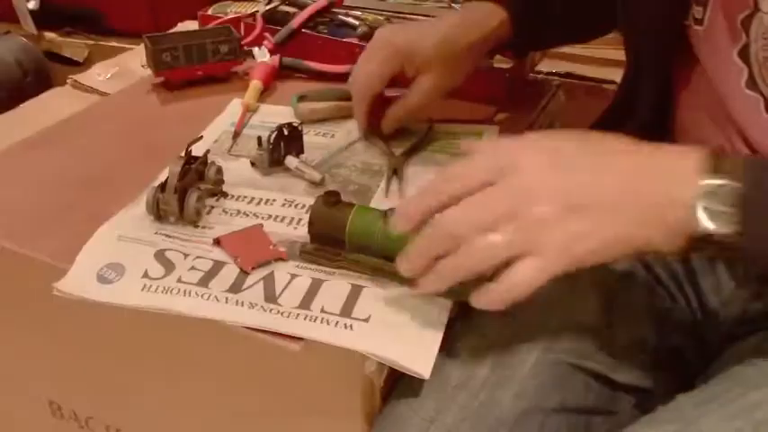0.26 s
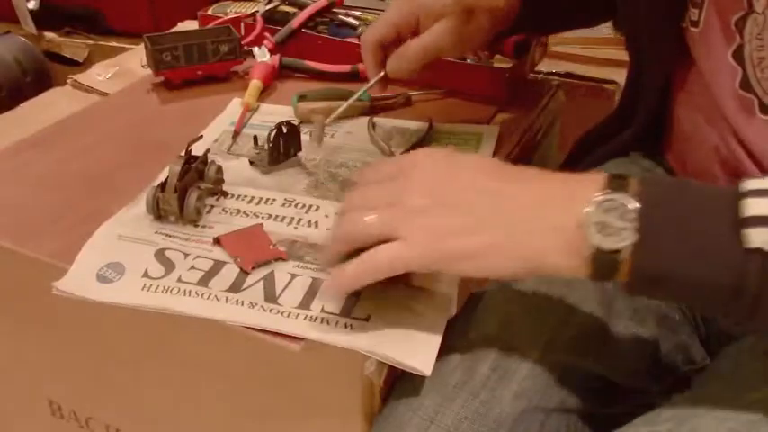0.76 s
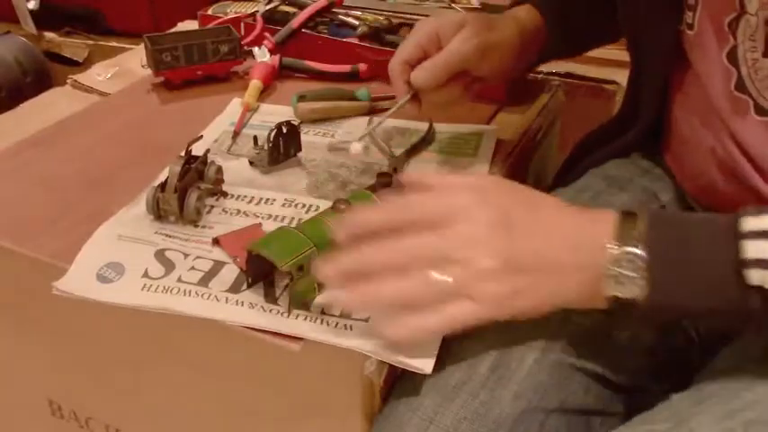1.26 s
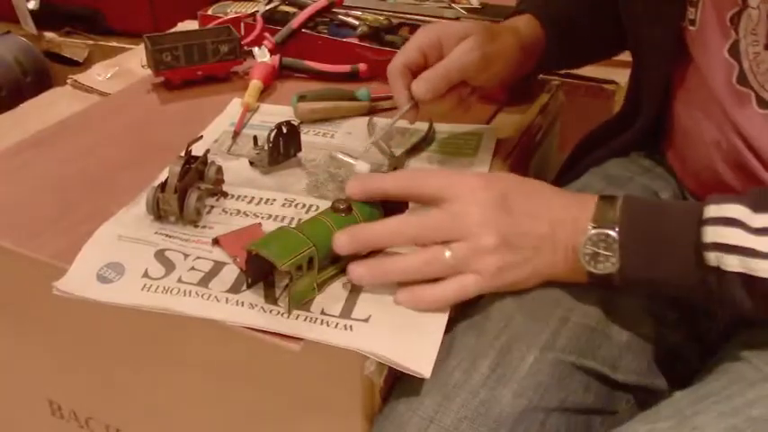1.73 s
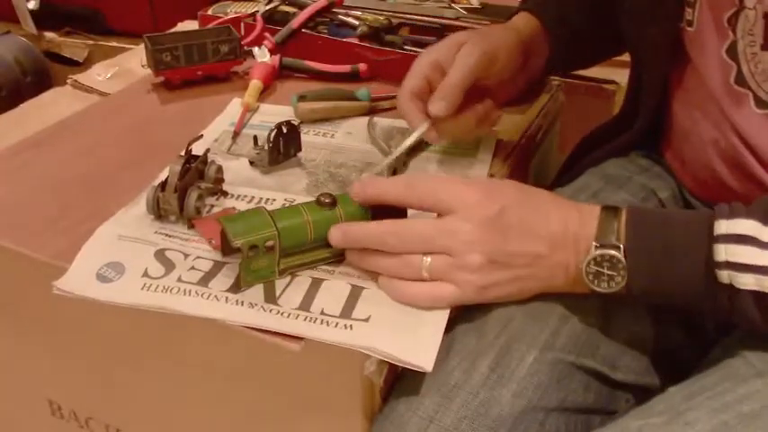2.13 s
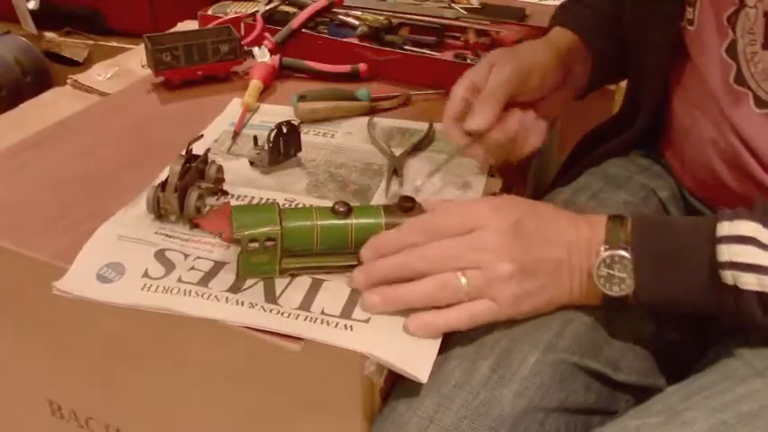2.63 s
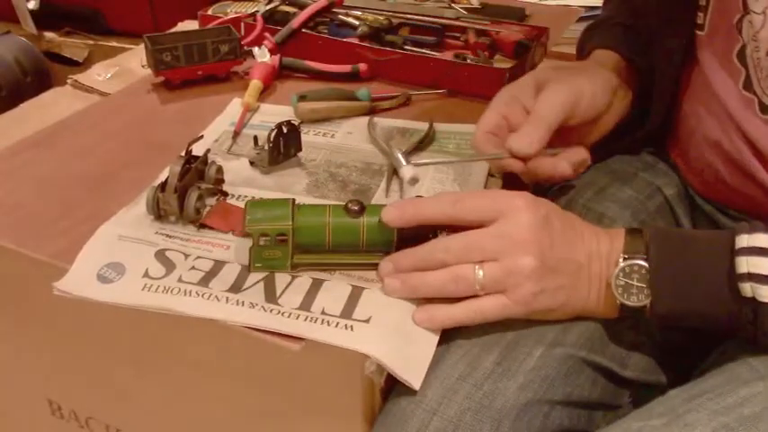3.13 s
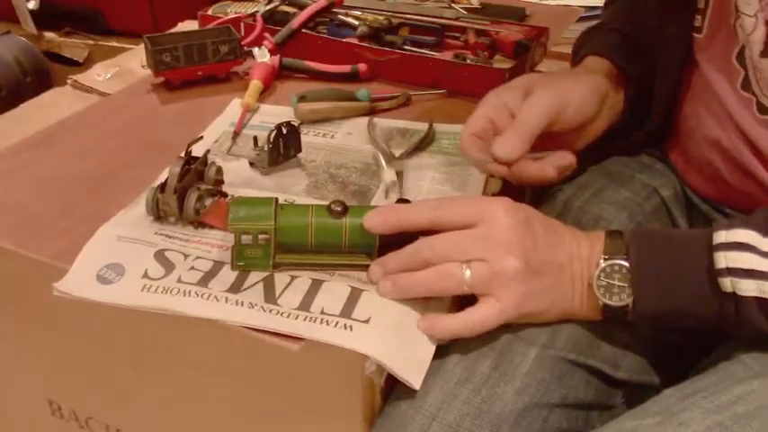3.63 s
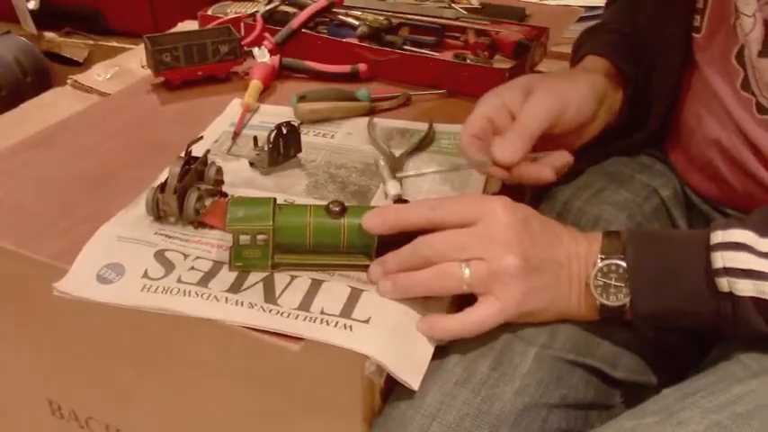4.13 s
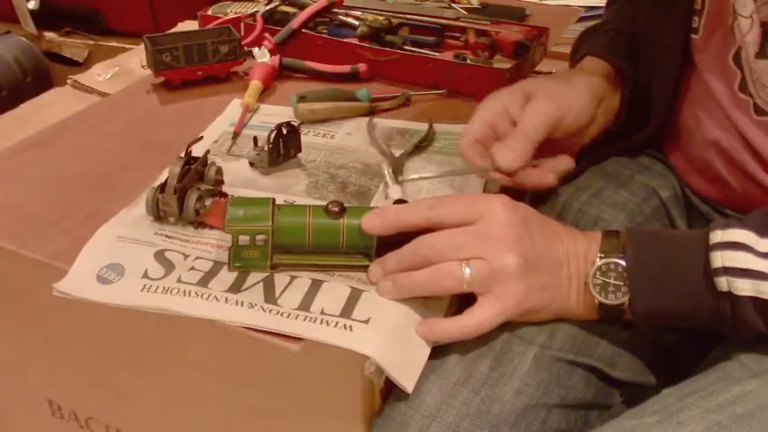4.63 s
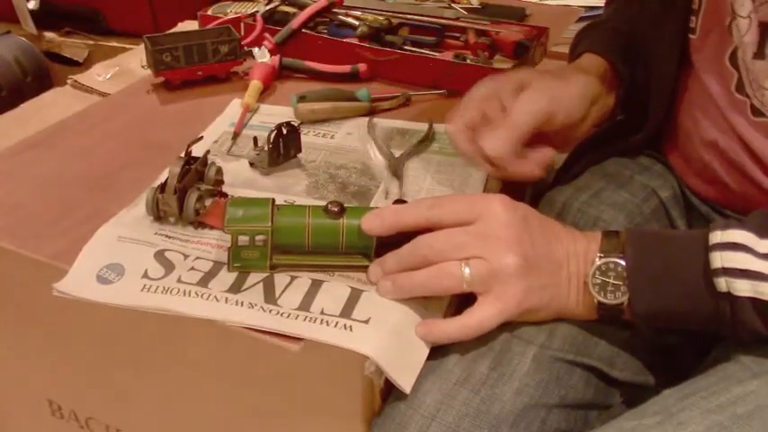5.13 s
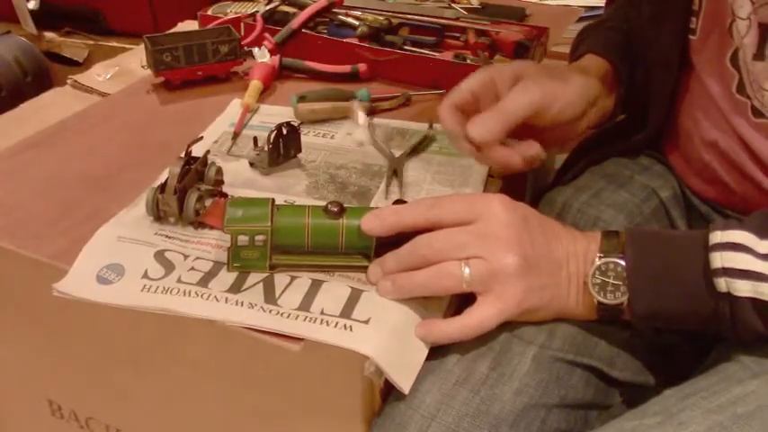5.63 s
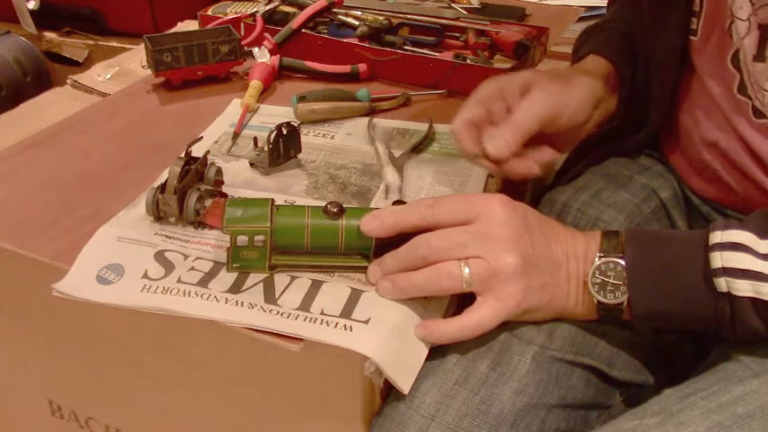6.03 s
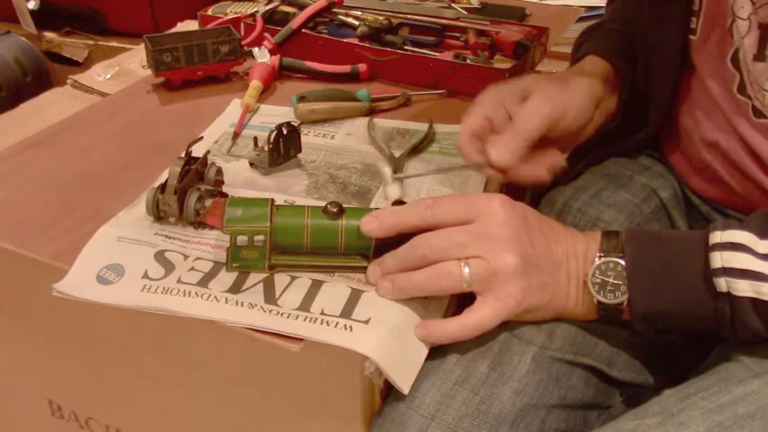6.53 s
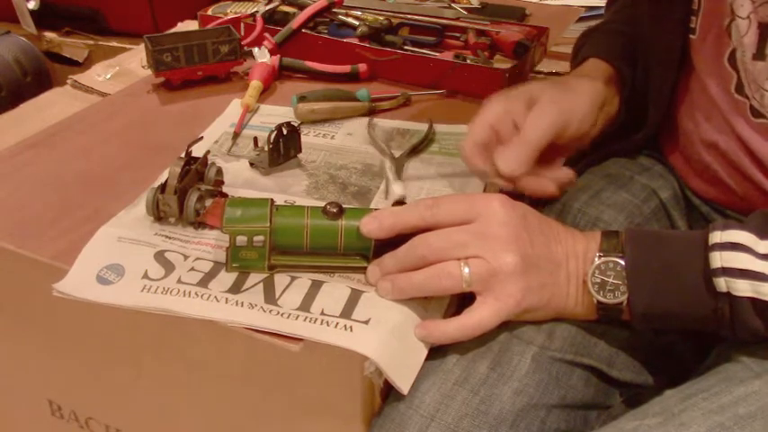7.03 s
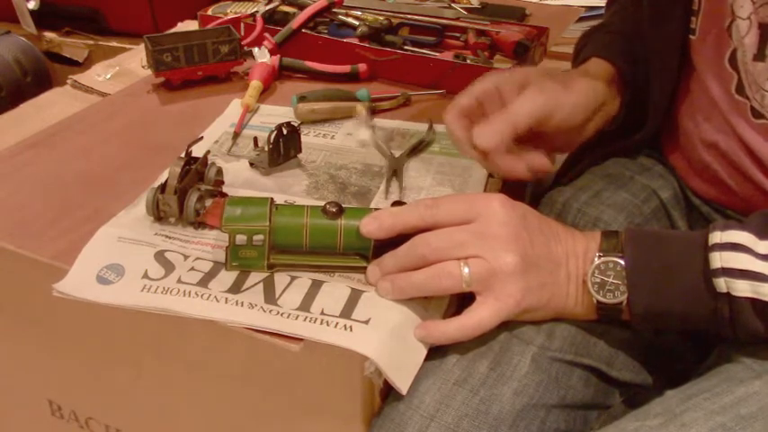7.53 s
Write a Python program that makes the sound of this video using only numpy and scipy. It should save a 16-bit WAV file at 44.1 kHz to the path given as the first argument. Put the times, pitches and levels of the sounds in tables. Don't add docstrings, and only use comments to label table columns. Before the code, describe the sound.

Close, nearly centred microphones in a small room with a low hum. A tin-plate toy engine is turned and slid on newspaper over a cardboard box, with short scrapes, thin rings, clicks and knocks. Then a steel rod taps evenly, almost four times a second, each blow a sharp crack with a hollow boxy boom and a faint tin rattle.

```python
import sys
import numpy as np
from scipy import signal
from scipy.fft import rfft, irfft, next_fast_len
from scipy.io import wavfile
from scipy.ndimage import uniform_filter1d, map_coordinates

SR = 44100
rng = np.random.default_rng(int(sys.argv[2]) if len(sys.argv) > 2 else 0)


def rack_gain(trim_db):
    fader = np.asarray(trim_db, float)
    return 10 ** (fader / 20)


def dump(signal):
    limited = np.clip(np.atleast_2d(signal).T, -1, 1)
    pcm = np.round(limited * 32767).astype(np.int16)
    wavfile.write(sys.argv[1], SR, pcm)


N = 342657
TOP_HZ = 15950


def unit(x):
    return x / np.sqrt(np.mean(x ** 2) + 1e-20)


def along(points, hz):
    f, value = np.transpose(points)
    return np.interp(np.log(hz + 1), np.log(f + 1), value)


def filtered(x, response):
    size = next_fast_len(x.shape[-1] + 8192)
    spectrum = rfft(x, size) * response(np.fft.rfftfreq(size, 1 / SR))
    return irfft(spectrum, size)[..., :x.shape[-1]]


def resonance(hz, center_hz, width_hz):
    return 1 / (1 + (2 * (hz - center_hz) / width_hz) ** 2)


def wobble(size, rate):
    knots = rng.standard_normal(int(size * rate / SR) + 4)
    return map_coordinates(knots, [np.arange(size) * rate / SR], order=1)


def ring(modes, t, scatter_db):
    hz, db, t60 = np.transpose(modes)[:, :, None]
    strength, shift = rng.standard_normal((2, len(modes), 1))
    decay = rack_gain(db + scatter_db * strength - 60 * t / t60)
    return np.sum(decay * np.sin(2 * np.pi * hz * (1 + 0.0058 * shift) * t), axis=0)


# pitch_hz, level_db per Hz
HUM = [(20, -32), (50, -5.5), (100, -10.5), (180, -3.5), (255, -6), (340, -8), (420, -6), (600, -9.5),
       (1060, -9), (1470, -21.5), (4200, -27.5), (9000, -35.5), (15500, -52), (16500, -63)]
# pitch_hz, width_hz, level_db
MACHINE_TONES = [(247, 13, -62)]


def hum():
    t = np.arange(N) / SR
    air = unit(filtered(rng.standard_normal((2, N)), lambda hz: rack_gain(along(HUM, hz))))
    air *= rack_gain([[1], [-22]]) * rack_gain(-51.5 - 0.07 * t)
    for pitch_hz, width_hz, level_db in MACHINE_TONES:
        tone = filtered(rng.standard_normal(N), lambda hz: resonance(hz, pitch_hz, width_hz))
        air[0] += rack_gain(level_db) * unit(tone)
    fade_s, fade_bend = 0.22, 1.77
    return air * (1 - np.exp(-(t / fade_s) ** fade_bend))


def stroke_db(t, rise, hold, speed):
    rise_db, sag_db_per_s, let_go_db_per_s = 15, 33, 167
    since = np.maximum(t - rise, 0)
    fall = sag_db_per_s * np.minimum(since, hold)
    fall += speed * let_go_db_per_s * np.maximum(since - hold, 0)
    return -rise_db * np.maximum(1 - t / rise, 0) - fall


# pitch_hz, width_hz, level_db
TIN_A = [(1400, 35, -9), (1670, 47, -11), (2140, 33, -5), (2870, 160, -2), (4290, 30, -7), (5150, 45, -4),
         (7300, 40, -40), (8300, 45, -9), (8870, 47, -5)]
TIN_B = [(2530, 36, 3), (3120, 78, 4), (4400, 27, 1), (5080, 35, 3), (5940, 60, -4), (7740, 110, -21),
         (9100, 39, -8), (10870, 66, -9)]
TIN_C = [(1230, 7.7, -3), (2380, 63, -4), (3080, 31, 1), (3550, 52, 2), (3800, 40, -5), (4190, 24, 0),
         (5750, 34, -4), (6300, 34, -9), (7000, 89, -27), (8240, 34, -3), (9000, 54, -16), (9150, 30, -10)]
TIN_D = [(1200, 16, 7), (2076, 110, 4), (3730, 160, 2.5), (4180, 67, -1), (4700, 31, -11), (4980, 26, -12),
         (6140, 60, -6), (7860, 50, -19), (7980, 41, 5), (8730, 63, 1), (9900, 26, -11), (11100, 33, -23),
         (11600, 65, -22)]
TIN_E = [(1716, 23, -11), (2193, 45, 3), (2343, 60, 7), (3240, 190, -7), (5600, 330, -13), (6240, 44, -20),
         (6650, 50, -22), (9400, 190, -15)]
TIN_F = [(1197, 29, -3), (1647, 34, -4), (2260, 98, 3), (3480, 170, -10), (5520, 280, -14), (6050, 50, -10),
         (8360, 51, -21), (9840, 42, -8)]
TIN_G = [(1670, 28, 10), (2244, 55, 7), (3330, 200, -20), (6400, 60, -16), (8790, 45, -18),
         (9100, 130, -14)]
TIN_H = [(1190, 70, 11), (2230, 40, 4), (3370, 140, -4), (8000, 130, -15), (9780, 38, -14)]
# tin resonances, ring_over_rub_db
GRIPS = [(TIN_A, 0), (TIN_B, 4), (TIN_C, 1), (TIN_B, -6), (TIN_D, 6), (TIN_E, 4), (TIN_F, 4.1),
         (TIN_G, -1.5), (TIN_H, 0)]
# start_s, rise_s, hold_s, level_db, brightness_db
STROKES = [
    [(0.27, 0.028, .1, -74, 2), (0.435, 0.02, 0.018, -59, -2), (0.51, 0.017, 0.068, -39.5, -2),
     (0.65, 0.026, 0.0077, -55, 6)],
    [(0.693, 0.02, 0.043, -40, -3)],
    [(0.8, 0.045, .005, -45, -10), (0.85, 0.012, 0.043, -39, -1), (0.89, 0.062, 0.013, -37, -2.5)],
    [(1.335, 0.049, 0.064, -59.5, 2), (1.57, 0.037, 0.18, -61.5, -2.5), (1.735, 0.0088, 0.0037, -52.5, -17)],
    [(1.775, 0.052, 0.054, -31.5, -2), (1.9, 0.018, .05, -44, -7)],
    [(1.985, 0.011, 0.054, -47.5, -22), (2.05, .01, .05, -54, -19), (2.125, 0.014, .004, -64, -9),
     (2.16, 0.029, 0.095, -39, -10.5), (2.385, 0.025, 0.049, -40.5, -10), (2.43, 0.034, 0.011, -43.5, -7)],
    [(2.575, 0.036, 0.052, -34, -16), (2.69, 0.059, .005, -41, -9.5)],
    [(2.915, 0.018, 0.14, -47.5, -7), (3.1, 0.096, 0.013, -53.5, -7)],
    [(3.258, 0.012, 0.057, -42, -8.5), (3.38, 0.019, 0.084, -53, -11)],
]
# pitch_hz, level_db per Hz
RUB = [(410, -42), (700, 7), (1190, -11), (1550, -6.5), (2070, 0.5), (7370, -2.5), (7970, 1), (14800, -13),
       (15900, -17.5), (16500, -55)]


def slides():
    out, clock = np.zeros(N), np.arange(N) / SR
    trail_s, split_hz, highs_faster = .25, 5000, 1.3
    low = lambda hz: 1 / (1 + (hz / split_hz) ** 6)
    high = lambda hz: 1 - low(hz)
    for rows, (tin, ring_db) in zip(STROKES, GRIPS):
        start, rise, hold, db, bright_db = np.transpose(rows)[:, :, None]
        a = round(start.min() * SR)
        b = round(((start + rise + hold).max() + trail_s) * SR)
        grains = rng.standard_normal((2, b - a)) * rack_gain(3.5 * rng.standard_normal((2, b - a)))

        def mode(pitch_hz, width_hz):
            drive = grains[0] * rack_gain(2.2 * wobble(b - a, 44.6))
            return signal.lfilter(*signal.iirpeak(pitch_hz, pitch_hz / width_hz, SR), drive)

        sheet = unit(sum(rack_gain(0.6 * level_db) * mode(hz, width) for hz, width, level_db in tin))
        minor = unit(sum(mode(hz, 40) for hz in 1300 * 9 ** rng.uniform(size=32)))
        paper = unit(grains[1]) + rack_gain(0.5) * minor
        rub = unit(filtered(paper, lambda hz: rack_gain(along(RUB, hz))))
        mix = rack_gain(ring_db - 2.5) * sheet + rub
        t = clock[a:b] - start
        for top_db, speed, band in [(db, 1, low), (db + bright_db, highs_faster, high)]:
            power = (t > 0) * rack_gain(top_db + stroke_db(t, rise, hold, speed)) ** 2
            out[a:b] += np.sqrt(np.sum(power, axis=0)) * unit(filtered(mix, band))
    return out


def partials(table):
    out, t = np.zeros(N), np.arange(SR // 3) / SR
    for start_s, pitch_hz, level_db, t60_s in table:
        note = ring([(pitch_hz, level_db, t60_s)], t, scatter_db=2.5)
        out[round(start_s * SR):][:len(t)] += note * (1 - np.exp(-t / 0.00044))
    return out


# start_s, pitch_hz,
# level_db, t60_s
PINGS = [(0.462, 3120, -39, 0.043), (1.915, 4220, -26, 0.046), (1.916, 10300, -42, 0.13),
         (1.916, 5150, -39, 0.2), (1.9, 5600, -36, 0.28), (2.554, 1670, -19.5, 0.047),
         (3.315, 5220, -43, 0.24), (3.325, 5500, -47, 0.25), (3.315, 9780, -43, 0.13),
         (3.315, 9400, -52, .2), (3.315, 4140, -41, .15), (3.315, 11600, -54, .1), (3.579, 3770, -47, 0.15),
         (3.58, 3800, -43, 0.18), (3.86, 3550, -57, 0.28), (7.326, 502, -35, .25), (7.326, 547, -20, 0.21),
         (7.326, 720, -27, 0.11), (7.326, 738, -23, 0.26)]


def loose_parts():
    return partials(PINGS)


# pitch_hz, t60_s
ROOM = [(100, 0.5), (400, 0.55), (1500, 0.46), (4000, 0.44), (8000, 0.4), (15000, 0.22)]


def dying(size, patchy_db):
    hz, t, z = signal.stft(rng.standard_normal((2, size)), SR, nperseg=256)
    patches = uniform_filter1d(rng.standard_normal(z.shape[1:]), size=3, axis=0)
    patches = unit(uniform_filter1d(patches, size=8, axis=1))
    decay_db = patchy_db * patches - 60 * t / along(ROOM, hz)[:, None]
    return signal.istft(z * rack_gain(decay_db), SR, nperseg=256)[1][:, :size]


# pitch_hz, level_db per Hz
CRACK = [(350, -17.5), (600, -9), (860, -10), (1460, -4.5), (2100, -7.5), (2430, -11.5), (3000, -5.5),
         (4000, -11), (4870, -23), (6000, -13), (7280, -11.5), (8250, -6), (11800, -23.5), (14800, -23),
         (15600, -32), (16500, -50)]
# pitch_hz, width_hz, depth (0-1)
HOLLOWS = [
    (1002, 100, 0.7),
    (2034, 180, 0.8),
    (7330, 300, .8),
]


def contact_crack(rod, shape, tilt):
    same = .5
    noise = same * rod + np.sqrt(1 - same ** 2) * rng.standard_normal(rod.shape)
    crack = filtered(noise, lambda hz: rack_gain(along(CRACK, hz) + along(tilt, hz)))
    crack *= shape * np.linalg.norm(shape) / np.linalg.norm(shape * crack, axis=1, keepdims=True)

    def notch(hz, center, width, depth):
        return 1 - depth * 1j * hz * width / (center * center - hz * hz + 1j * hz * width)

    return filtered(crack, lambda hz: np.prod([notch(hz, *row) for row in HOLLOWS], axis=0))


# pitch_hz, level_db, t60_s
BOX = [(135, -22.5, 0.43), (184, -18, 0.28), (226.6, 7.5, 0.07), (250.5, -12.5, 0.25), (287.4, -1, 0.29),
       (314.4, -2, 0.2), (350, 4, 0.13), (380, 0, 0.26), (439, -9, 0.27), (508, -8.5, 0.21),
       (557.6, -14, 0.22), (562, 1.5, 0.033), (729, -19, 0.21), (761, -12.5, 0.16)]


def box_boom(t):
    late = np.maximum(t - .0016, 0)
    thump = -np.sin(2 * np.pi * 270 * late) * np.exp(-(late / 0.0051) ** 2)
    thump += rack_gain(-9.5) * np.roll(thump, round(.033 * SR))
    fill = (1 - 0.6 * np.exp(-(late / 0.016) ** 2)) * (1 - np.exp(-late / 0.0022))
    return thump, -ring(BOX, late, scatter_db=0.5) * fill


# pitch_hz, level_db per Hz
TAIL = [(35, -51), (60, -9), (219, -8.5), (366, -4.5), (497, -10.5), (760, -18.5), (961, -24.5),
        (1540, -26.5), (1690, -18), (2190, -22.5), (2580, -24), (3260, -22), (3750, -26.5), (4900, -27.5),
        (6300, -27.5), (12000, -34.5), (15000, -40.5), (15900, -49), (16500, -81.5)]
# pitch_hz, width_hz, over_room_db
SHEET = [(1180, 118, 9.5), (1297, 32, 7.5), (1406, 44, 12.5), (1467, 53, 11), (1560, 29, 12),
         (1730, 12, 3.5), (2340, 48, 4.5), (2810, 58, 5), (3200, 23, 5), (3510, 40, 8), (3950, 400, 4.5),
         (6660, 460, 4.5)]


def room_tail(walls, t, tilt, boom_db):
    low = [(600, boom_db + 8.0), (900, 0.012)]
    shaken = rng.uniform(.6, 1.15, len(SHEET))
    shift = 1 + 0.0081 * rng.standard_normal()

    def tin_db(hz):
        return sum(g * db * resonance(hz, shift * center, width) for g, (center, width, db) in zip(shaken, SHEET))

    def color(hz):
        db = along(TAIL, hz) + .5 * along(tilt[1:], hz) + along(low, hz) + tin_db(hz)
        return rack_gain(db) * (hz < TOP_HZ)

    fresh = dying(len(t), patchy_db=2.0)
    fresh += filtered(.8 * (walls - fresh), lambda hz: hz < 650)
    return filtered(fresh, color) * (1 - np.exp(-(t / 0.0033) ** 2))


def hits(events, crack_s, echo_db, rattle_db, knock_db, room_db):
    out, t = np.zeros((2, N + SR)), np.arange(2 * SR // 5) / SR
    rod = rng.standard_normal((2, len(t)))
    walls = dying(len(t), patchy_db=2.5)

    def burst(u):
        return (u > 0) * (1 - np.exp(-(u / 0.00049) ** 2)) * np.exp(-abs(u) / crack_s)

    for start_s, db, boom_db, mid_db, bright_db in events:
        tilt = [(500, mid_db + 12.0), (1700, mid_db + 13.5), (3500, 0), (5000, 0), (8000, bright_db + 9.5)]
        shape = burst(t) + rack_gain(echo_db + 0.089 * db) * burst(t - .0047)
        shape += rack_gain(rattle_db - 60 * t / 0.095) * (1 - np.exp(-t / 0.00053))
        crack = contact_crack(rod, shape, tilt)
        thump, boom = box_boom(t)
        tail = rack_gain(room_db) * room_tail(walls, t, tilt, boom_db)
        dry = rack_gain(-0.5) * crack[0] + rack_gain(boom_db - 1.5) * boom + rack_gain(boom_db + 8.0) * thump
        dry += rack_gain(knock_db + mid_db - 60 * t / 0.0024) * np.sin(2 * np.pi * 1120 * t)
        apart = rack_gain(-34) * dry + rack_gain(-22) * crack[1] + rack_gain(-26) * tail[1]
        out[:, round(start_s * SR):][:, :len(t)] += rack_gain(db) * np.array([dry + tail[0], apart])
    return filtered(out[:, :N], lambda hz: (1j * hz / (135 + 1j * hz)) ** 2)


# start_s, peak_db, boom_db, mid_db, bright_db
CLICKS = [(0.4628, -31, -20, -31, -13), (0.5376, -18, -28, -16, -22), (1.7706, -13, -28, -21, -25),
          (1.8495, -11.5, -29.5, -18.5, -15), (1.9168, -20.5, -28, -27, -19), (1.9772, -12, -14, -7, -23),
          (2.0418, -12, -27, -14.5, -20.5), (2.14, -24, -22, -12, -18), (2.162, -34, -34, 0, -31),
          (2.2702, -19.5, -43, -19, -31), (2.3385, -30, -37, 4.5, -23), (2.5545, -11, -31.5, -18.5, -15.5),
          (2.6544, -13, -23, -10, -18), (2.7499, -24, -27, -4, -18), (3.2724, -27, -34, -9, -29),
          (3.3156, -30, -30, -13, -14), (3.4845, -39, -20, -20, -14)]


def clicks():
    return rack_gain(-3.5) * hits(CLICKS, crack_s=0.0012, echo_db=-19, rattle_db=-17.0, knock_db=5.5, room_db=5.0)


# start_s, pitch_hz, level_db, t60_s
RINGS = [(0.525, 1340, -35, .08), (0.533, 1400, -30, 0.064), (0.58, 3050, -42, .07),
         (0.713, 3110, -40, .12), (0.714, 5900, -41, .15), (0.866, 3550, -35, 0.15), (0.8, 2500, -39, .06),
         (0.952, 2340, -32, 0.079), (0.955, 3180, -35, .12), (0.965, 1184, -44, 0.37),
         (0.967, 4100, -44, .45), (0.97, 4330, -48, .3), (1.0, 2336, -47, 0.28), (0.97, 3400, -46, 0.31),
         (0.97, 1200, -49, 0.49), (1.77, 3600, -21.5, 0.024), (1.77, 5900, -31, 0.026),
         (1.85, 3440, -22, 0.056), (1.79, 135, -46.5, 0.31), (0.65, 135, -49, 0.32),
         (1.978, 2350, -36.5, 0.13), (1.978, 3400, -26, 0.036), (1.8, 2840, -31, 0.02),
         (2.044, 1810, -34, .06), (2.14, 3320, -35, 0.036), (2.14, 5300, -38, 0.03), (2.14, 5900, -42, .04),
         (1.9, 1730, -35, .08), (2.161, 780, -33, 0.037), (2.46, 2510, -39, .1), (2.554, 3650, -29, 0.13),
         (2.555, 5800, -29, 0.043), (2.556, 8400, -35, .03), (2.554, 2320, -32, 0.16),
         (2.654, 3630, -29.5, 0.065), (2.654, 4200, -30, .05), (2.728, 1670, -39, 0.074),
         (2.75, 1760, -32, 0.063), (2.943, 2180, -41, 0.13), (3.0, 2280, -50, 0.13), (2.97, 4220, -54, .3),
         (3.272, 2600, -44, .04), (3.193, 1670, -47.5, .2), (3.271, 1170, -37, .12), (3.271, 3420, -40, .1),
         (3.315, 6090, -55, .15), (2.175, 2350, -37, 0.34), (2.17, 1720, -43, .3), (1.8, 3800, -30, .08)]
# start_s, pitch_hz, level_db, t60_s
MORE_RINGS = [
    (0.715, 5100, -46, .4),
    (0.72, 4350, -47, .3),
    (0.9, 1400, -47, .4),
    (0.92, 6500, -45, .08),
    (1.81, 4150, -36, .15),
    (1.87, 4750, -40, .15),
    (2.405, 2200, -40, .06),
    (2.62, 1200, -42, .2),
    (2.81, 780, -51, .3),
    (3.33, 5500, -49, .25),
]


def ringing_tin():
    tin = partials(RINGS) + partials(MORE_RINGS)
    waver_db = 2 * wobble(N, 70)
    return tin * rack_gain(waver_db + np.array([[0], [-30]]))


# start_s, peak_db, boom_db, mid_db, bright_db
TAPS = [(3.5792, -11.5, -11, -18.5, -17.5), (3.8595, -12.5, -12, -15.5, -15), (4.1102, -8, -12, -14, -18),
        (4.3696, -4, -14, -13, -13), (4.6361, -1.5, -14, -13, -16), (4.9057, -3, -12.5, -13.5, -11),
        (5.1694, -3.5, -10.5, -12.5, -12), (5.4308, -0.5, -11, -11.5, -10), (5.7054, 0.5, -12, -8, -10.5),
        (5.9801, 0.5, -11.5, -13.5, -11), (6.2392, -0.5, -10, -13, -8), (6.5087, 0.5, -11, -13.5, -11.5),
        (6.7788, 1.5, -11, -17, -12.5), (7.0477, 2, -13, -16.5, -12), (7.3196, -1, -13, -8.5, -7),
        (7.606, 1.5, -12, -15.5, -10)]


def taps():
    return hits(TAPS, crack_s=0.0016, echo_db=-6, rattle_db=-19, knock_db=-2.5, room_db=6.0)


# start_s, peak_db, boom_db, mid_db, bright_db
BOUNCES = [
    (5.4742, -4.5, -15, -5, -16.5),
    (7.0875, -5, -16, -6, -16),
    (7.326, -13, -11.5, 6.5, -3),
    (4.671, -19, -20, -4, -17),
    (6.018, -17, -20, -8, -12),
]


def bounces():
    return rack_gain(2.0) * hits(BOUNCES, crack_s=0.00085, echo_db=-10, rattle_db=-21, knock_db=8.5, room_db=-0.5)


# pitch_hz, level_db
WIDE = [(30, 28), (70, 1), (150, -6), (300, 2.5), (600, 0.5), (1500, -2.5), (3000, -2.5), (5000, -2.5),
        (7600, -6), (10000, -2), (15000, 1)]


def scene():
    rub = slides() + loose_parts()
    echo = dying(SR // 2, patchy_db=2.0)
    echo /= np.linalg.norm(echo[0])
    room = signal.fftconvolve(rub[None], echo, axes=1)[:, :N]
    rub = rub * rack_gain([[0], [-34]]) + rack_gain([[-14], [-27]]) * room
    steady = filtered(rub + hum() + ringing_tin(), lambda hz: hz < TOP_HZ)
    mid, side = steady + clicks() + taps() + bounces()
    side = filtered(side, lambda hz: rack_gain(along(WIDE, hz)))
    return np.array([mid + side, mid - side]) * rack_gain([[.06], [-.06]])


def top_cut(x):
    return signal.sosfilt(signal.butter(12, 16840, fs=SR, output="sos"), x)


def record(dry):
    for corner_hz in (70, 45):
        dry = filtered(dry, lambda hz: 1j * hz / (corner_hz + 1j * hz))
    top, hard = .92, 5
    rounded = dry / (1 + np.abs(dry / top) ** hard) ** (1 / hard)
    mix = filtered(rounded, lambda hz: 1 / (1 + (hz / 16400) ** 60))
    return top_cut(mix)


dry = scene()
out = record(dry)
dump(out)
```